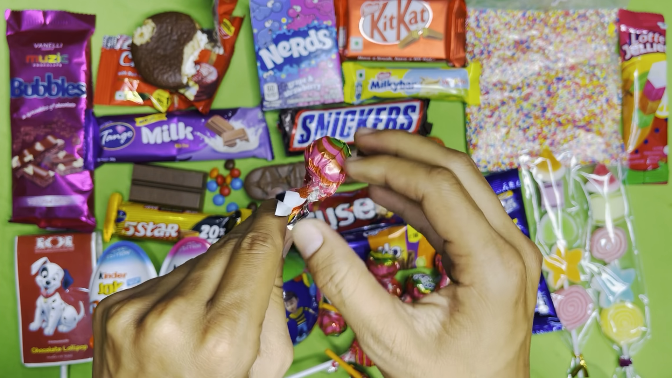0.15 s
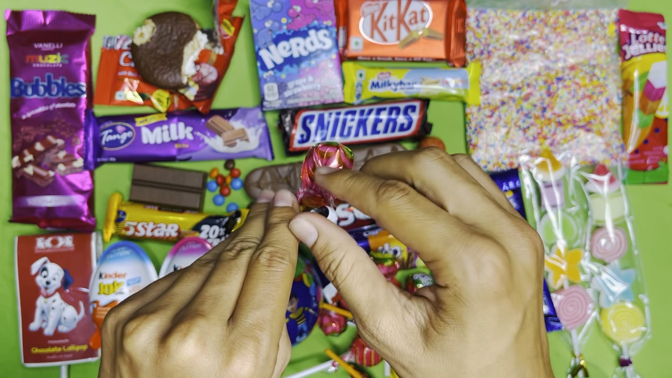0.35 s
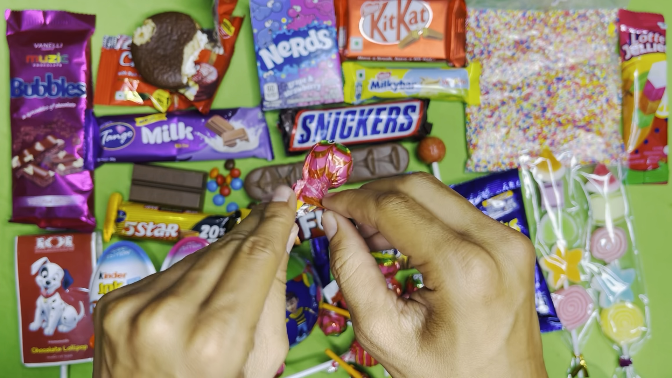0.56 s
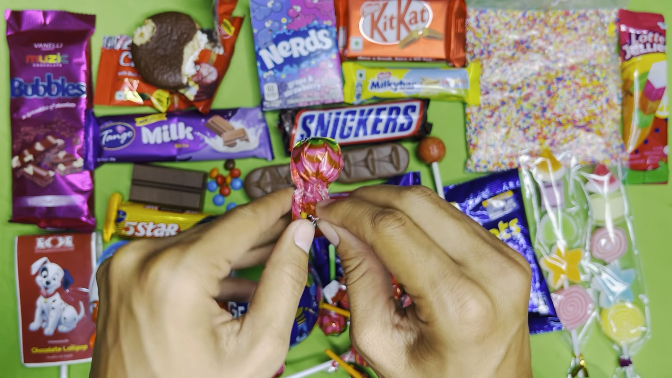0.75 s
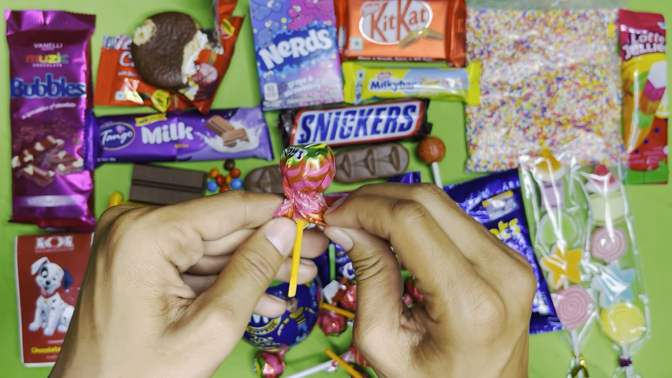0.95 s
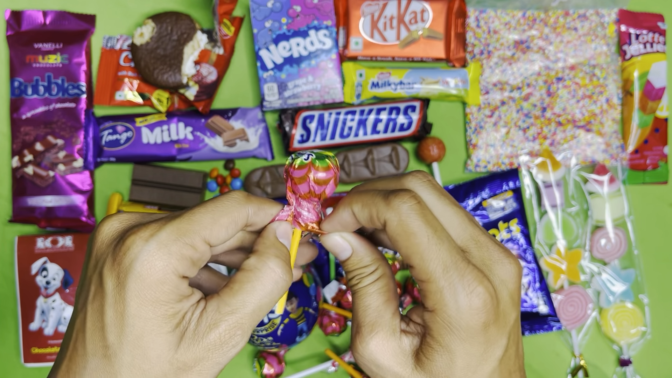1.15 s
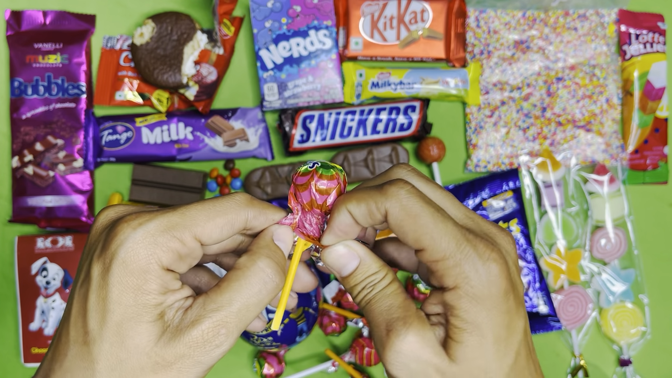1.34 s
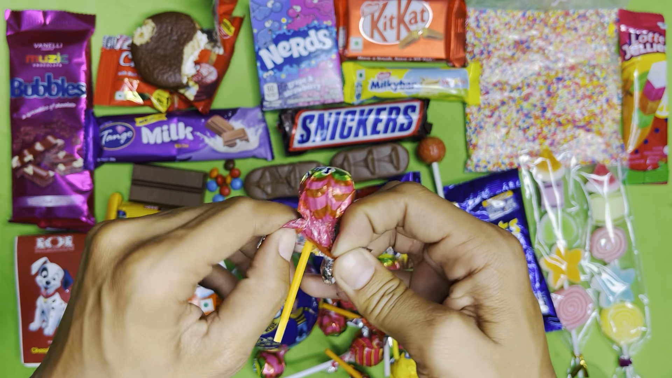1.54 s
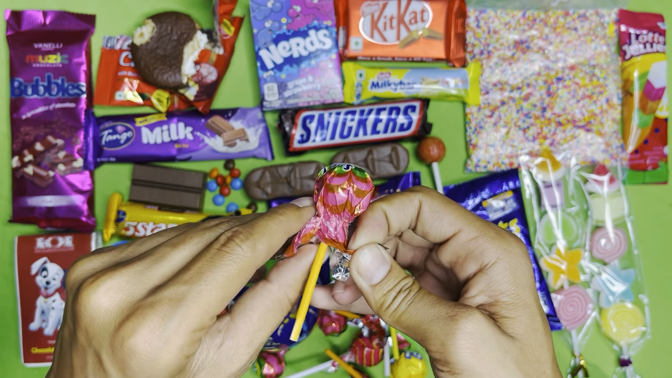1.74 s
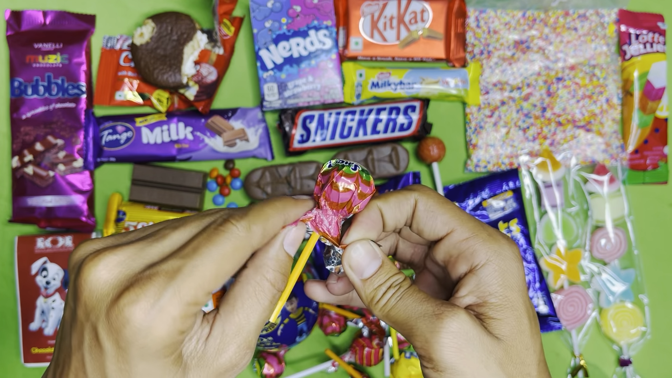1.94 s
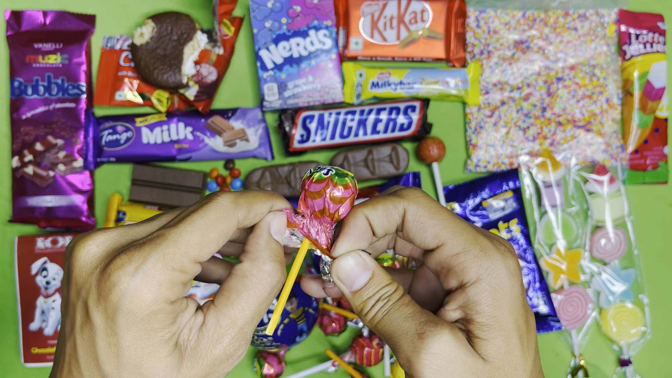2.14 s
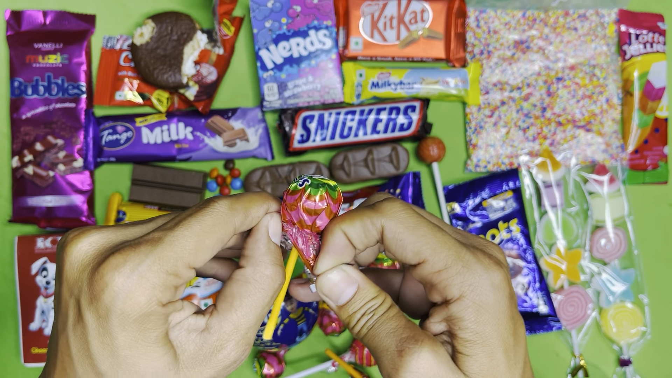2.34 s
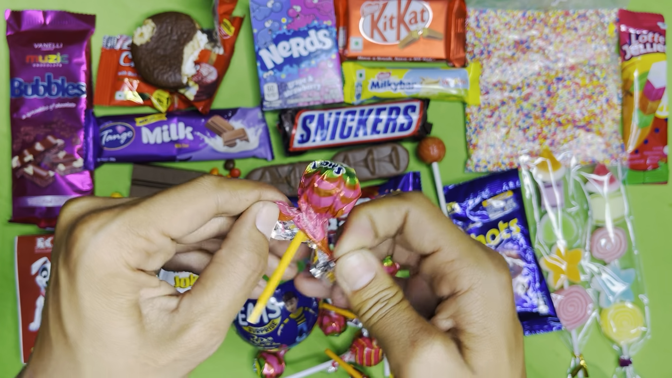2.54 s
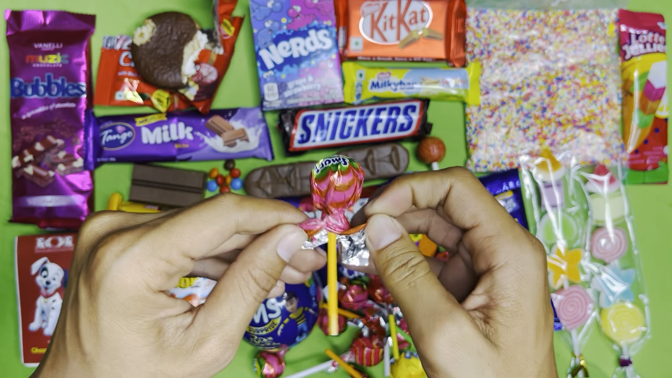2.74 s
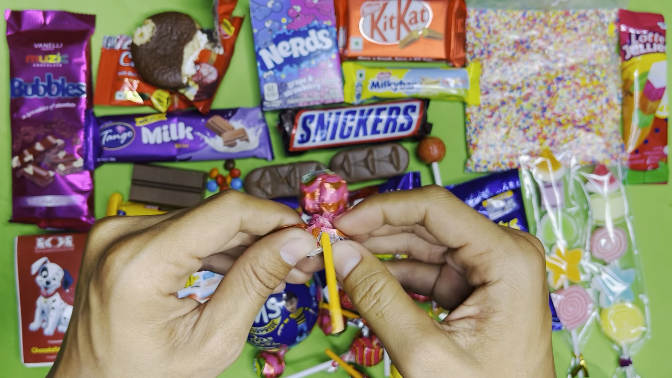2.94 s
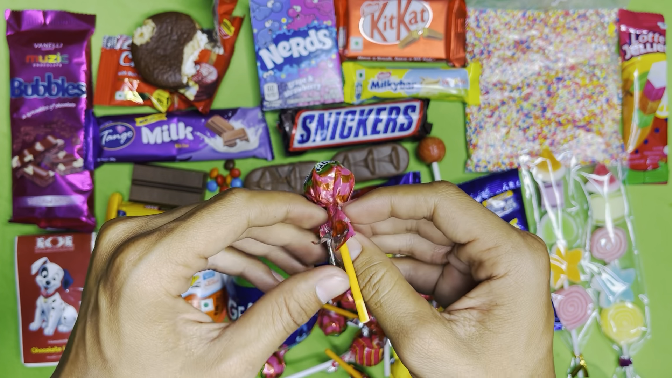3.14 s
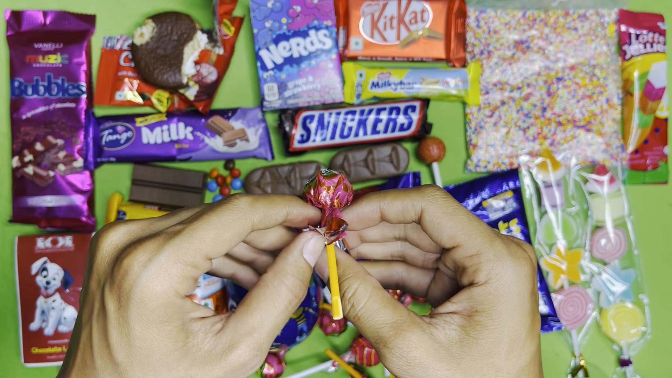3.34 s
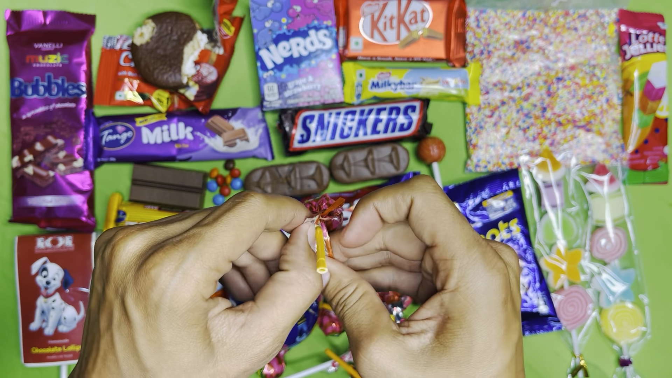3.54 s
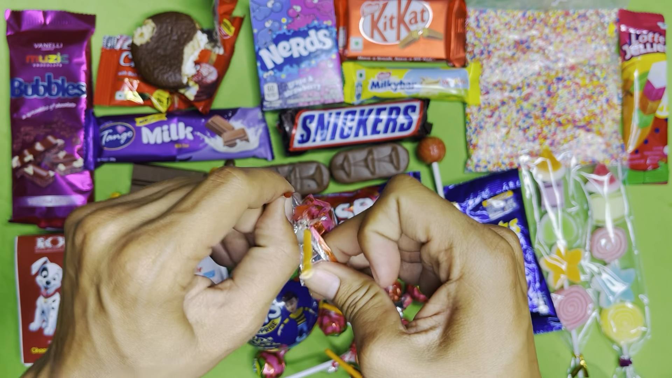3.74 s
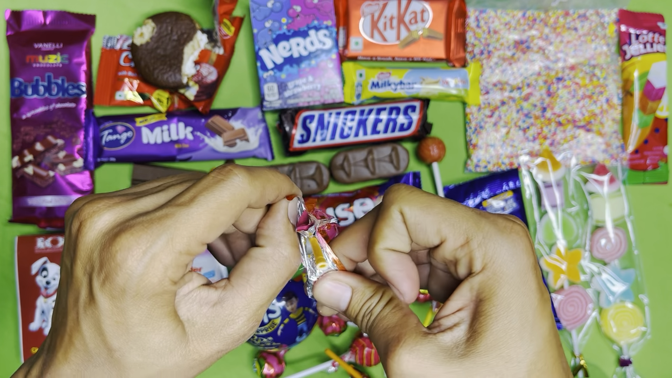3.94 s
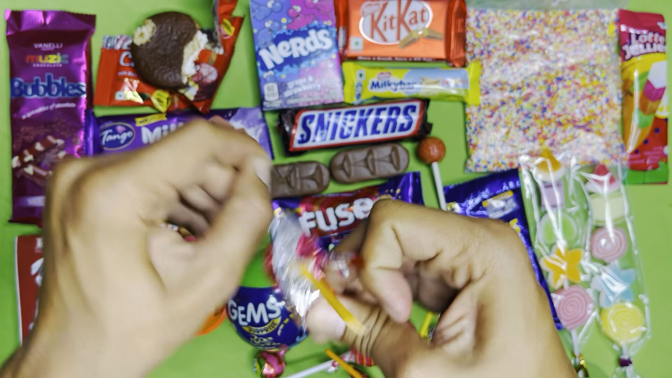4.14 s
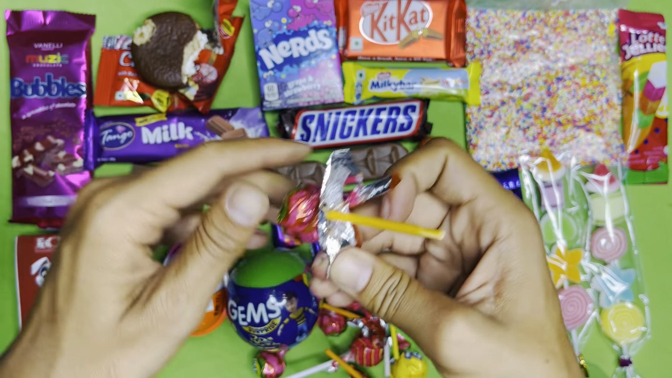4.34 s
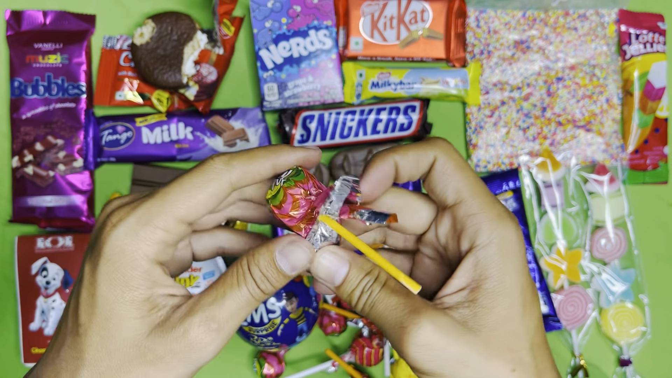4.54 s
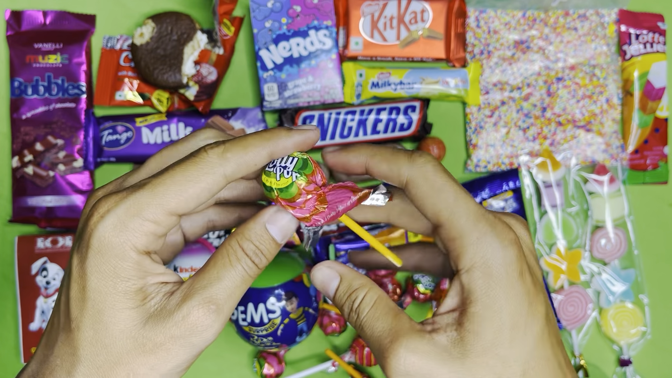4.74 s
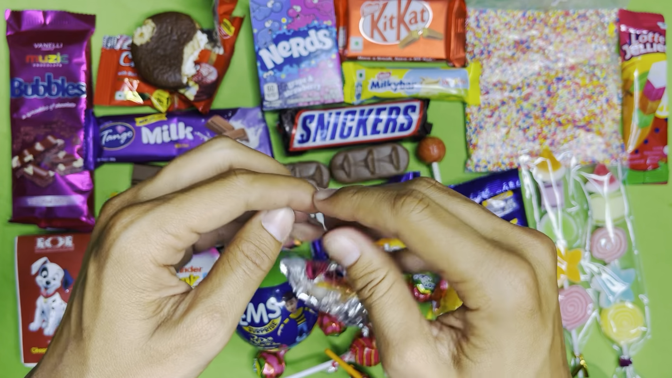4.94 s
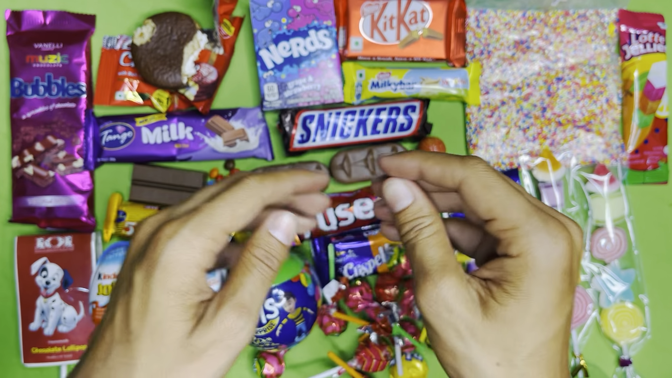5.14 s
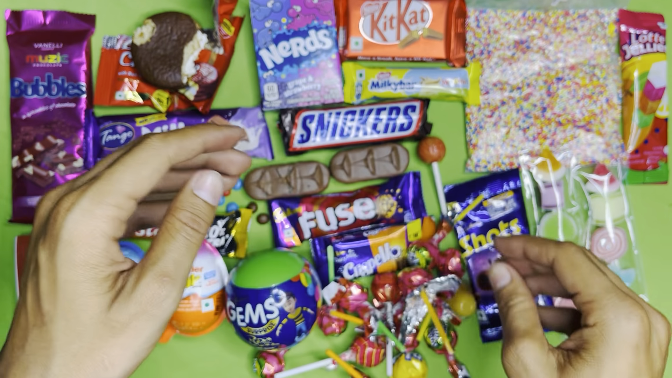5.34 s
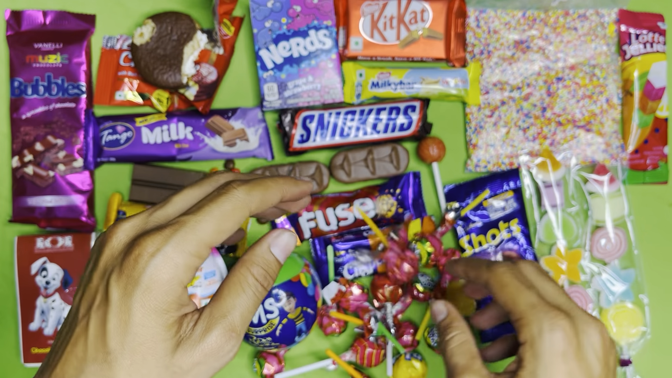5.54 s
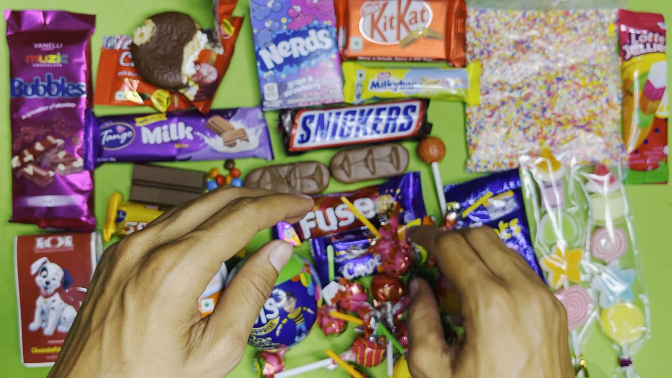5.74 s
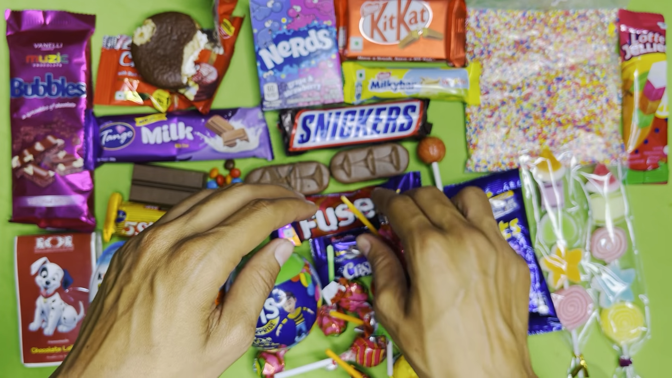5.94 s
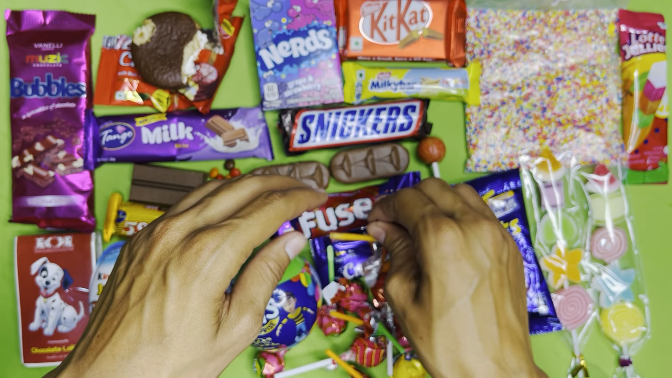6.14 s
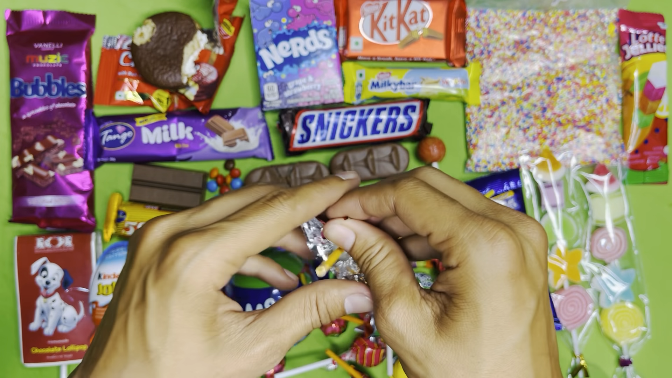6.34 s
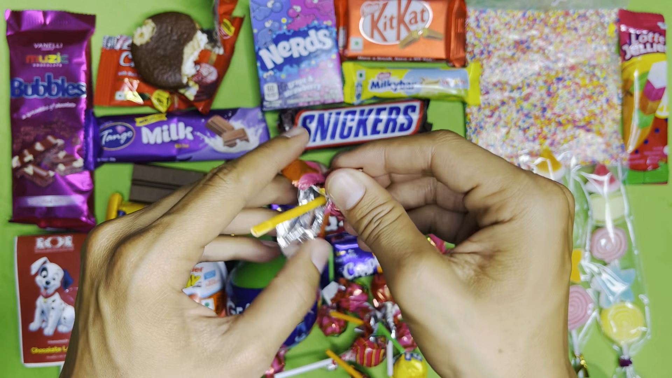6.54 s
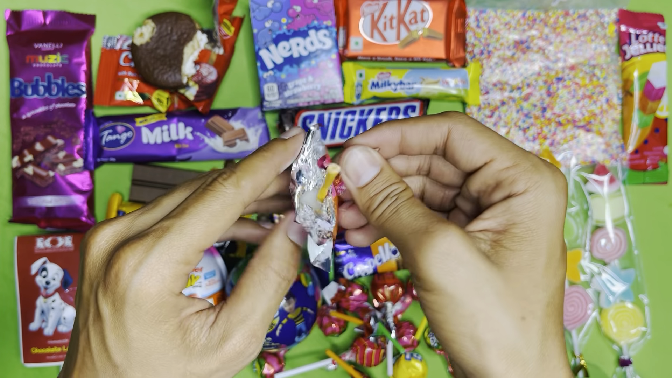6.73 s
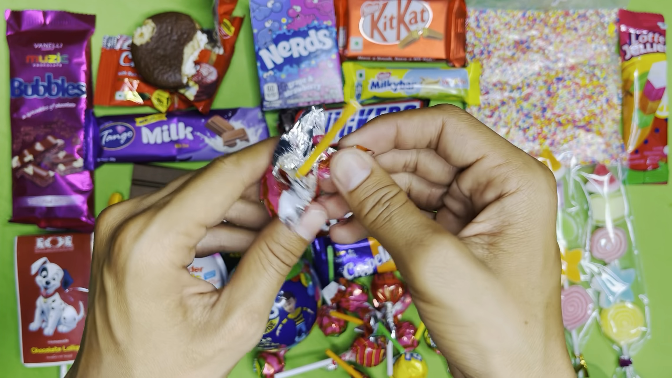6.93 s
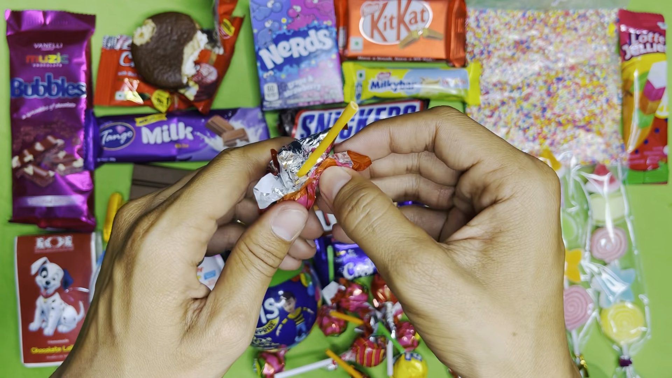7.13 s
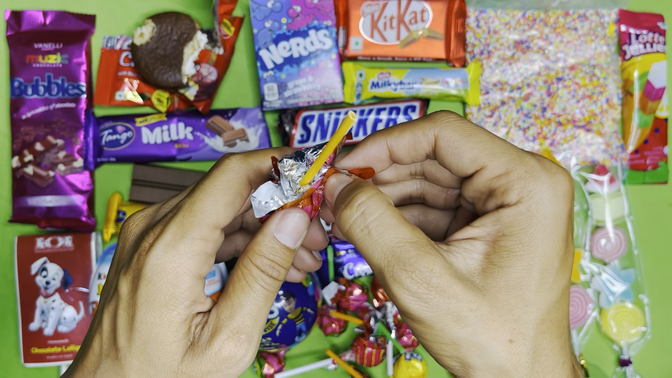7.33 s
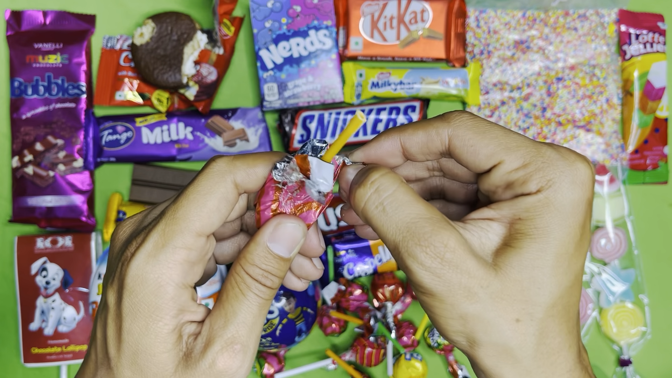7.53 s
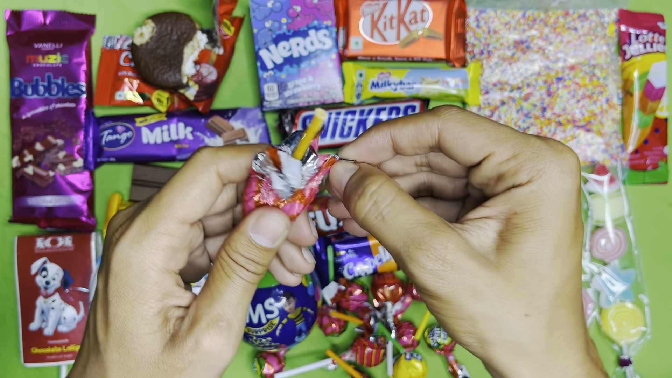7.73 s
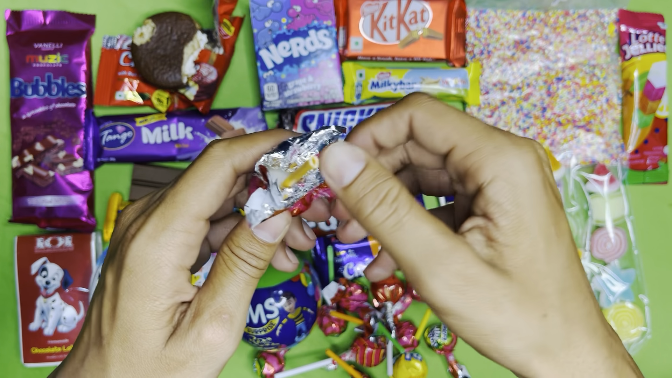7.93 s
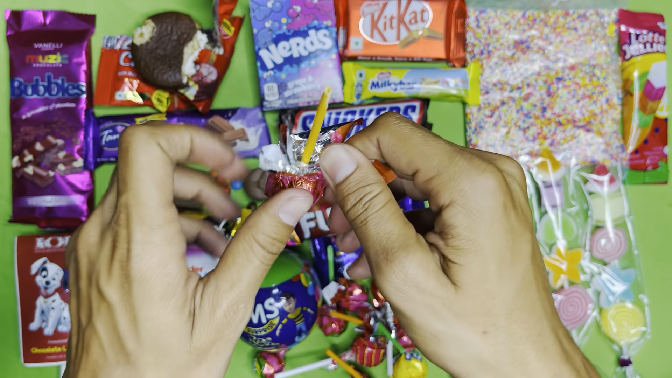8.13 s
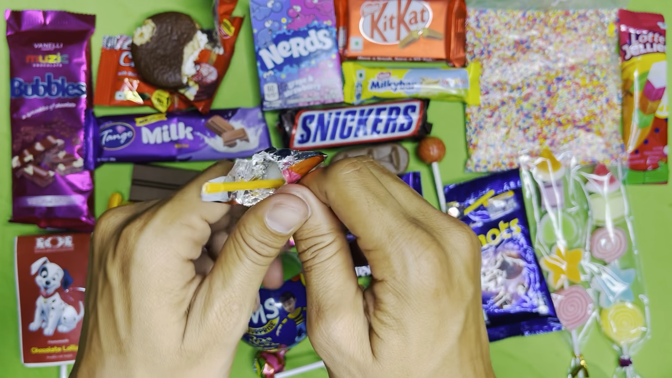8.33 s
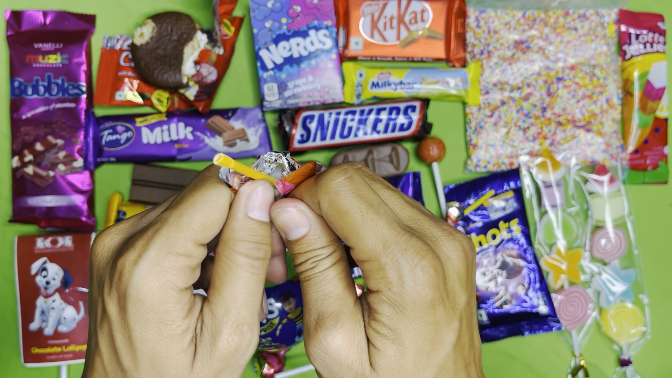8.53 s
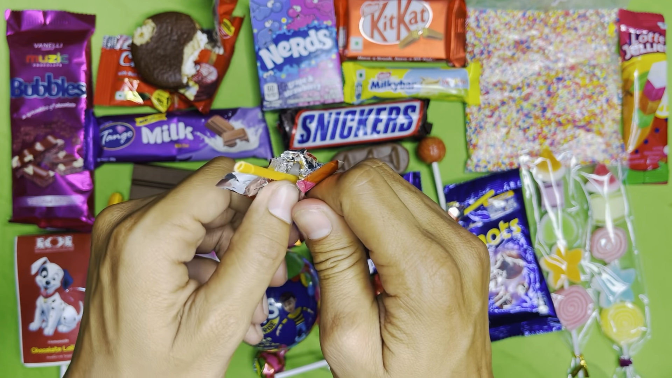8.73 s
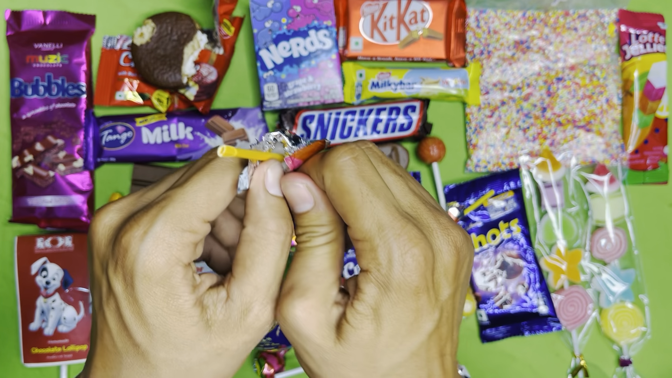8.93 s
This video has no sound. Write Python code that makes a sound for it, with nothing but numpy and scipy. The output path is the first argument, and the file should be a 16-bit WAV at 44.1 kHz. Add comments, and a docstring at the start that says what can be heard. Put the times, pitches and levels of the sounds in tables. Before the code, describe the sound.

Stiff foil-plastic candy wrapper crinkled and torn close by, bright snaps over fine crackle, one hard table knock midway, faint low rumble behind.

```python
"""Close to a two-port microphone in a live room, fingers work the stiff foil-plastic wrapper of a lollipop.
First light rustles and bright snaps over a fine crackle, with a low rumble behind that comes and goes.
Near 3.7 to 4.2 s the twist tears open: the loudest snaps, whole panels that pop, tugs that thud.
At 5 s something hard knocks once on the table and the room answers; a sparser stretch follows.
From 6 s peeling resumes and runs to the end. Filtered noise bursts make the snaps, pops, crackle and knock."""
import sys
import numpy as np
from scipy import signal
from scipy.fft import rfft, irfft, next_fast_len
from scipy.io import wavfile
from scipy.ndimage import uniform_filter1d

SR = 44100
rng = np.random.default_rng(int(sys.argv[2]) if len(sys.argv) > 2 else 0)


def persist_wave(psi):
    """Save psi, clipped to +-1, as 16-bit WAV."""
    counts = np.round(np.clip(psi, -1, 1) * 32767).astype(np.int16)
    wavfile.write(sys.argv[1], SR, np.atleast_2d(counts).T)


N = 396011  # samples
MS = SR / 1000  # samples in 1 ms: energy-1 sounds times sqrt(MS) get their level as rms over 1 ms


def amp(db):
    """Decibels to gain."""
    return 10 ** (np.asarray(db) / 20)


def unit(x):
    """Scales a sound to energy 1."""
    return x / np.sqrt(np.sum(x ** 2) + 1e-20)


def read(points, hz):
    """Reads a table of values against frequency on a log-frequency axis."""
    f, value = np.transpose(points)
    return np.interp(np.log(hz + 1), np.log(f + 1), value)


def bins(size):
    """Frequencies of a spectrum of that many samples."""
    return np.fft.rfftfreq(size, 1 / SR)


def add(mix, s, sound):
    """Mixes a sound in at a time in seconds."""
    part = mix[max(round(s * SR), 0):][:len(sound)]
    part += sound[:len(part)]


def hump(f, hz, octaves):
    """A broad resonance, in dB."""
    return -10 * np.log10(1 + (np.log2((f + 1) / hz) / octaves) ** 2)


def ring(push, colour_db):
    """Passes a short push through a causal, minimum-phase filter of that colour; energy 1."""
    log_gain = np.log(amp(np.maximum(colour_db, -80)))
    circle = np.concatenate([log_gain, log_gain[-2:0:-1]])
    response = np.exp(np.conj(signal.hilbert(circle)))[:len(log_gain)]
    return unit(irfft(rfft(push) * response))


def buckle(jolt_s, flutter_db, flutter_s, size=1024):
    """A jolt that swells and dies in a moment, plus a longer flutter."""
    t = np.arange(size) / SR
    jolt, flutter = rng.standard_normal((2, size))
    jolt = unit(jolt * t * np.exp(-t / jolt_s))
    flutter = unit(flutter * np.exp(-t / flutter_s))
    return jolt + amp(flutter_db) * flutter


def disperse(x, spread_s):
    """Bending waves cross a panel: the slow low ones arrive last."""
    phase = 4 * np.pi * spread_s * np.sqrt(100 * bins(len(x)))
    return irfft(rfft(x) * np.exp(-1j * phase))


def thud(hz, decay_s):
    """A low push whose pitch sinks to hz as it dies; energy 1."""
    t = np.arange(2048) / SR
    turns = np.cumsum(hz * (1 + 1.2 * np.exp(-t / .004))) / SR
    return unit(np.sin(2 * np.pi * turns) * np.exp(-t / decay_s))


# how alike diffuse sound is at the two ports: [frequency_hz, likeness (0 to 1)]
PORT_LIKENESS = [(100, 0.95), (300, 0.82), (400, 0.52), (600, 0.14), (1000, 0.03), (1500, 0.64),
                 (2000, 0.33), (3000, 0.13), (4500, 0.092), (6000, .93), (13000, .93)]


def diffuse(size):
    """Spectra of a noise that arrives from all sides, partly alike at the two ports."""
    left, other = rfft(rng.standard_normal((2, size)))
    same = np.clip(read(PORT_LIKENESS, bins(size)), 0, 1)
    right = same * left + np.sqrt(1 - same ** 2) * other
    return np.array([left, right])


def noise(colour):
    """Steady diffuse noise of that spectrum, rms 1."""
    spectra = diffuse(N) * amp(read(colour, bins(N)))
    return unit(irfft(spectra, N)) * np.sqrt(2 * N)


# far rumble, before its random waver: [time_s, level_db]
RUMBLE_LEVEL = [(0, -66.5), (1, -65), (2, -63), (3.3, -63), (3.6, -64), (4.35, -61), (4.55, -70.5),
                (4.95, -67.5), (5.3, -57), (5.649, -68.5), (5.9, -74.5), (7.15, -70.5), (7.3, -63.5),
                (7.6, -61), (8.1, -62.5), (8.98, -64)]
# air stirred as the hands shift: [time_s, level_db]
HANDLING_LEVEL = [(0, -64), (1, -71), (3.2, -70), (3.5, -60.5), (4.2, -88), (4.5, -94.5), (7.3, -91),
                  (7.55, -60), (7.85, -64), (8.101, -80), (8.98, -87.5)]
# their spectra and that of the hiss, shape only: [frequency_hz, relative_db_per_hz]
RUMBLE_SPECTRUM = [(20, -48.5), (40, -22.5), (60, -9.5), (110, -5), (170, -6), (210, -1), (260, -9.5),
                   (298, 3.5), (335, -12), (450, -11.5), (650, -16.5), (1000, -26), (2000, -41.5)]
HANDLING_SPECTRUM = [(20, -43.5), (40, -9.5), (55, 2.5), (80, -3.5), (130, -2), (300, -27)]
HISS_SPECTRUM = [(100, 0), (500, -3), (900, -7), (1500, -4), (4000, -10), (11000, -9), (14000, -30),
                 (16500, -48)]


def background(hiss_db=-78, waver_db=1.5, waver_step_s=.09):
    """Low rumble that swells, sinks and wavers, air stirred by the hands, and a faint hiss."""
    t = np.arange(N) / SR
    rumble_db = np.interp(t, *np.transpose(RUMBLE_LEVEL))
    handling_db = np.interp(t, *np.transpose(HANDLING_LEVEL))
    moments = np.arange(0, t[-1] + 1, waver_step_s)
    rumble_db += waver_db * np.interp(t, moments, rng.standard_normal(len(moments)))
    rumble = amp(rumble_db) * noise(RUMBLE_SPECTRUM)
    handling = amp(handling_db) * noise(HANDLING_SPECTRUM)
    return rumble + handling + amp(hiss_db) * noise(HISS_SPECTRUM)


# how long the room rings: [frequency_hz, time_to_fall_60_db_s]
ROOM_DECAY = [(100, 0.65), (260, 0.68), (700, 0.65), (1840, 0.53), (4850, 0.47), (12800, 0.39)]


def room(x, onset_s=.003):
    """A dense diffuse echo in which the bass hangs longest."""
    hz, t, z = signal.stft(irfft(diffuse(SR), SR), SR, nperseg=256)
    decay = amp(-60 * t / read(ROOM_DECAY, hz)[:, None])
    tail = signal.istft(z * decay, SR, nperseg=256)[1]
    tail *= 1 - np.exp(-(np.arange(tail.shape[1]) / SR / onset_s) ** 2)
    tail = np.array([unit(side) for side in tail])
    return signal.fftconvolve(x[None], tail, axes=1)[:, :N]


# hard knock on the table, level of its board sound over 1 ms: [start_s, level_db]
TABLE_KNOCKS = [(5.0181, -8)]
# spectrum of the board, shape only: [frequency_hz, relative_db_per_hz]
KNOCK_SPECTRUM = [(30, -30.5), (50, -13), (90, -6.5), (190, 4), (330, 2), (460, 5), (650, -9.5),
                  (1200, 1.5), (1900, -3), (3100, 1), (4800, -2.5), (7000, -11), (11000, -9.5),
                  (13500, -39), (16500, -47.5)]


def knocks(thud_db=-9, thud_hz=280, echo_db=-5, size=2048):
    """A hard, dead blow on a board, with a low thud; the room gathers it from all sides as one smooth wash."""
    near, spread = np.zeros((2, N))
    colour_db, blow = read(KNOCK_SPECTRUM, bins(size)), signal.unit_impulse(size)
    for s, db in TABLE_KNOCKS:
        rattle = amp(-6) * buckle(jolt_s=.0005, flutter_db=-6, flutter_s=.006, size=size)
        board = disperse(ring(blow + rattle, colour_db), spread_s=.006)
        low = amp(thud_db) * thud(thud_hz, decay_s=.011)
        add(near, s, amp(db) * (board + low))
        add(spread, s, amp(db + echo_db) * ring(blow, colour_db))
    return (near + room(spread)) * np.sqrt(MS)


# hard tugs that jerk the whole lollipop, dry level over 1 ms: [start_s, level_db, settled_pitch_hz]
TUGS = [(3.389, -50, 108.8), (3.682, -39, 140), (3.710, -47, 168.4), (4.024, -39.5, 154),
        (4.155, -26.5, 120), (7.524, -47, 138)]


def thuds():
    """The lollipop jerks in the fingers when the twist lets go."""
    out = np.zeros(N)
    for s, db, hz in TUGS:
        add(out, s, amp(db) * thud(hz, decay_s=0.0039))
    return out * np.sqrt(MS)


# spectra of a facet's tick and of the sheet around it, shape only: [frequency_hz, relative_db_per_hz]
CRACK_SPECTRUM = [(2500, -42.5), (4800, -5), (5800, -10), (7500, -7), (9300, -10), (11200, -4),
                  (12300, -13.5), (13800, -20), (15600, -19), (16600, -24.5)]
BODY_SPECTRUM = [(100, -25), (500, -8.5), (1100, -2), (1900, -5.5), (3200, -2.5), (4400, -5), (5600, -2.5),
                 (8000, -29.5)]


def crack(hz):
    """The bright tick of one small facet of film, gone in a few milliseconds."""
    push = buckle(jolt_s=.00008, flutter_db=-4.5, flutter_s=.0018)
    f = bins(len(push))
    return ring(push, read(CRACK_SPECTRUM, f) + hump(f, hz, octaves=0.15))


def body(hz, octaves):
    """The lower ring of the sheet around a facet."""
    push = buckle(jolt_s=.0002, flutter_db=-4, flutter_s=.002)
    f = bins(len(push))
    return ring(push, read(BODY_SPECTRUM, f) + hump(f, hz, octaves))


# a crack's pitch is chance; the harder a crease shakes the sheet, the larger and lower the patch that rings
CRACK_HZ, CRACK_SCATTER_OCTAVES = 8980, 0.14
BODY_HZ, BODY_AT_DB, BODY_OCTAVES = 2960, -23, .32  # lowest pitch, level that reaches it, width of the ring
BODY_RISE_OCTAVES_PER_DB, BODY_TOP_HZ = 0.57, 4860  # softer rings sit higher, up to this top
BODY_SCATTER_OCTAVES = 0.15  # chance on top of those pitches


def snap(crack_db, body_db, crack_chance, body_chance):
    """A crease gives way with a crack and shakes the sheet."""
    crack_hz = CRACK_HZ * 2 ** (CRACK_SCATTER_OCTAVES * crack_chance)
    softer_db = max(BODY_AT_DB - body_db, 0)
    body_hz = min(BODY_HZ * 2 ** (BODY_RISE_OCTAVES_PER_DB * softer_db), BODY_TOP_HZ)
    body_hz *= 2 ** (BODY_SCATTER_OCTAVES * body_chance)
    tick = amp(crack_db) * crack(crack_hz)
    sheet = amp(body_db) * body(body_hz, BODY_OCTAVES)
    return (tick + sheet) * np.sqrt(MS)


RELEASE_S = .012


def press(length, attack_s, swell_db):
    """Finger pressure: an attack, a hold that may swell, and a release."""
    t = np.arange(0, length + 8 * RELEASE_S, 1 / SR)
    attack = np.minimum(t / attack_s, 1)
    hold = amp(swell_db * (np.minimum(t / length, 1) - 1.0))
    release = np.exp(-np.maximum(t - length, 0) / RELEASE_S)
    return attack * hold * release


# Crackle gains below are relative drives, not final levels. # spells in which the wrapper is worked and keeps
# rustling, or settles on the table just after the knock: [start_s, length_s, fine_db, body_db]
RUSTLE_SPELLS = [(0, 0.23, -57, -69.5), (0.337, 0.63, -69, -74.5), (0.905, 0.37, -58.5, -67),
                 (1.21, 0.47, -50.5, -63), (1.675, 1.63, -59, -68.5), (3.403, 1.57, -54.5, -63),
                 (5.103, .3, -64, -62.5), (5.45, .55, -80.5, -79), (5.98, 1.15, -59.5, -61.5),
                 (7.29, .81, -56.5, -66), (8.283, 0.65, -54.5, -65.5)]
# single squeezes of the fingers, and the wrapper's ticks as it falls and settles on the table just after the
# knock at 5 s: [start_s, length_s, fine_db, body_db]
FINGER_SQUEEZES = [(0.053, 0.048, -42.5, -54.5), (0.407, 0.02, -59, -62), (0.606, 0.037, -51.5, -54.5),
                   (0.698, 0.044, -49, -54.5), (0.963, 0.031, -49.5, -66), (1.24, 0.02, -51, -71),
                   (1.338, 0.037, -55, -70), (1.612, 0.041, -41, -49), (1.991, 0.029, -57.5, -53.5),
                   (2.372, 0.03, -47, -63), (2.51, 0.044, -44.5, -57), (2.601, 0.022, -41, -67),
                   (2.836, 0.073, -57, -63), (2.906, 0.032, -46.5, -57.5), (3.084, 0.047, -44.5, -56.5),
                   (3.394, 0.059, -49, -53.5), (3.616, 0.022, -39, -71), (3.678, 0.041, -36, -47),
                   (3.726, 0.039, -25, -36), (4.019, 0.018, -31, -44), (4.138, 0.027, -29.5, -43),
                   (4.521, 0.017, -62, -51.5), (4.609, 0.024, -42, -45), (4.732, 0.1, -49.5, -57.5),
                   (4.817, .06, -51.5, -51), (5.048, 0.021, -35.5, -67), (5.151, 0.022, -49, -66),
                   (5.236, 0.027, -51, -53.5), (5.554, 0.052, -56.5, -58.5), (6.03, 0.032, -51, -56),
                   (6.244, 0.023, -67, -52.5), (6.351, .03, -47, -57), (6.466, 0.056, -45, -52),
                   (6.576, 0.032, -39, -45), (6.74, 0.024, -46.5, -53), (6.806, 0.026, -72, -58),
                   (6.984, 0.034, -48, -54.5), (7.285, 0.031, -40.5, -58.5), (7.348, 0.068, -39.5, -63),
                   (7.423, 0.072, -32, -50), (7.511, 0.021, -55, -50), (7.731, 0.059, -45.5, -59),
                   (7.953, 0.093, -49.5, -52), (8.275, 0.032, -54, -45), (8.365, 0.022, -41, -48),
                   (8.483, .045, -36.5, -53.5), (8.654, 0.037, -64, -55), (8.81, 0.054, -52, -82),
                   (8.919, .055, -42, -56)]
SPELL_ATTACK_S = 0.013  # the fingers take hold gently
SQUEEZE_ATTACK_S, SQUEEZE_SWELL_DB = 0.0091, 2.5  # pressure builds through a squeeze, then lets go


def crumpling():
    """Gain of the fine crackle and of its body: squeezes on top of the light rustle of each spell."""
    fine, low = np.zeros((2, N))
    spells = RUSTLE_SPELLS, SPELL_ATTACK_S, 0
    squeezes = FINGER_SQUEEZES, SQUEEZE_ATTACK_S, SQUEEZE_SWELL_DB
    for rows, attack_s, swell_db in (spells, squeezes):
        for s, length, fine_db, body_db in rows:
            pressure = press(length, attack_s, swell_db)
            add(fine, s, amp(fine_db) * pressure)
            add(low, s, amp(body_db) * pressure)
    return fine + amp(-100), low  # the fine crackle never quite stops


def crackle(per_s=380, fine_db=-0.5, sheet_db=-2, count=16):
    """Tiny creases give way at random; harder crumpling makes them denser and louder."""
    fine, low = crumpling()
    rate = per_s * (fine / amp(-50.5)) ** 0.49  # per_s holds at a fine gain of -50.5 dB
    happens = rng.random(N) < rate / SR
    sizes = amp(5 * np.minimum(rng.exponential(1, N), 3)) * happens
    # the fingers feed in energy steadily, so few creases means large ones
    sizes /= np.sqrt(abs(uniform_filter1d(sizes ** 2, size=1800)) + 0.0028)
    # between the ticks, film rubs on film
    sliding = .2 * rng.standard_normal(N)
    # each sample belongs to one of count facets, each with its own two pitches
    facet, out = rng.integers(0, count, N), np.zeros(N)
    facets_hz = zip(np.geomspace(6800, 11800, count), np.geomspace(1700, 5000, count))
    for k, (crack_hz, body_hz) in enumerate(facets_hz):
        clicks = (sizes + sliding) * (facet == k)
        out += signal.oaconvolve(clicks * fine * amp(fine_db), crack(crack_hz))[:N]
        out += signal.oaconvolve(clicks * low * amp(sheet_db), body(body_hz, octaves=0.2))[:N]
    return out


def small_snaps(above_db=16, scatter_db=1.5, sheet_db=-12, sheet_scatter_db=4, gap_s=.06):
    """Smaller creases go at random all through a spell and stand out of its rustle."""
    out = np.zeros(N)
    for start, length, db, _ in RUSTLE_SPELLS:
        for s in np.arange(start + gap_s, start + length - gap_s, gap_s):
            size, shake, *chance = rng.standard_normal(4)
            crack_db = db + above_db + scatter_db * size
            body_db = crack_db + sheet_db + sheet_scatter_db * shake
            add(out, s + gap_s * rng.random(), snap(crack_db, body_db, *chance))
    return out


# whole panels that flip, level over 1 ms before the trim in pops: [start_s, level_db, pitch_hz]
PANEL_POPS = [(0.644, -38, 840), (1.65, -41, 1120), (1.998, -42.5, 1090), (2.795, -40, 1200),
              (3.391, -46.5, 460), (3.679, -35, 550), (3.707, -27.5, 684), (3.749, -26, 910),
              (3.897, -43, 1308), (4.005, -52, 780), (4.023, -25, 1021), (4.154, -18, 917.4),
              (4.407, -38.5, 1010), (4.625, -35, 1120), (5.447, -44.5, 1220), (6.6, -41.5, 970),
              (6.757, -46, 1300), (6.996, -40.5, 1330), (7.439, -40, 942), (7.525, -42, 570),
              (7.845, -39, 1110), (7.922, -42.5, 1110), (7.967, -39, 1064), (8.012, -39, 986),
              (8.301, -38.5, 1256), (8.348, -41.5, 910), (8.387, -31.5, 1140), (8.527, -42, 1124),
              (8.661, -35, 1210), (8.929, -34.5, 1170)]


def pops(trim_db=-2.5, size=2048):
    """A whole panel of the wrapper flips with a short falling chirp."""
    out, f = np.zeros(N), bins(size)
    treble_cut_db = -10 * np.log10(1 + (f / 1750) ** 8)
    for s, db, hz in PANEL_POPS:
        colour_db = 1.22 * hump(f, hz, octaves=0.7) + treble_cut_db
        push = buckle(jolt_s=0.0001, flutter_db=-10.5, flutter_s=0.01, size=size)
        pop = disperse(ring(push, colour_db), spread_s=.0033)
        add(out, s, amp(db + trim_db) * pop)
    return out * np.sqrt(MS)


# large creases that buckle, levels over 1 ms before the trims in snaps: [start_s, crack_db, body_db]
LARGE_CREASES = [(0.096, -29, -35.5), (0.2306, -39.5, -70), (0.348, -43, -54), (0.4607, -39.5, -72),
                 (0.4823, -41, -56), (0.5314, -41, -74), (0.707, -37.5, -58), (0.742, -37.5, -55),
                 (0.802, -35, -41), (0.8975, -37, -37.5), (0.9382, -30, -43), (1.035, -30, -42),
                 (1.065, -20.5, -29.5), (1.2103, -26, -43.5), (1.264, -30, -36), (1.3013, -34.5, -40),
                 (1.346, -27.5, -43), (1.363, -25.5, -42), (1.422, -20, -47), (1.5246, -22, -51),
                 (1.569, -25.5, -59), (1.6173, -25, -41), (1.6337, -23, -30.5), (1.742, -30.5, -43.5),
                 (1.858, -29, -63), (1.9792, -24, -63), (2.018, -30.5, -42), (2.108, -27, -58),
                 (2.1753, -25, -38), (2.2469, -34.5, -47), (2.3734, -23.5, -37.5), (2.4225, -29.5, -44),
                 (2.5343, -27.5, -45), (2.579, -26, -48), (2.6144, -30, -66), (2.7684, -31, -60),
                 (2.796, -28, -37), (2.8585, -28, -63), (2.9136, -34, -48), (2.9723, -26.5, -42),
                 (3.0352, -26.5, -38), (3.121, -30, -38), (3.2464, -32, -48), (3.4588, -26, -40),
                 (3.6164, -28, -54.5), (3.63, -24.5, -33.5), (3.681, -11, -29), (3.6881, -21, -28),
                 (3.7089, -11.5, -23.5), (3.7362, -34, -23), (3.7488, -14, -13), (3.764, -24.5, -21.5),
                 (3.8987, -28, -26), (3.926, -21.5, -23.5), (4.0047, -14.5, -22.5), (4.0253, -9.5, -15.5),
                 (4.0434, -13, -37), (4.1219, -36, -22), (4.1534, -10.5, -18.5), (4.183, -10, -41),
                 (4.3831, -28.5, -41), (4.4089, -21, -36), (4.535, -27, -41), (4.5804, -30.5, -60),
                 (4.6244, -38, -38), (4.752, -28, -40.5), (4.815, -24.5, -31.5), (4.8219, -25, -36),
                 (4.8772, -22, -24), (4.9159, -30.5, -34), (5.55, -37, -45.5), (6.03, -31, -52),
                 (6.1067, -27.5, -44.5), (6.1594, -27, -60), (6.348, -32.5, -47), (6.5088, -23.5, -52),
                 (6.5958, -21.5, -30.5), (6.6291, -24, -31), (6.6926, -26, -42), (6.8277, -31.5, -30.5),
                 (6.923, -35, -46), (7.0627, -32.5, -45.5), (7.115, -26.5, -39.5), (7.294, -26, -27.5),
                 (7.345, -25.5, -49), (7.397, -25, -39), (7.44, -16.5, -30), (7.4589, -36, -33.5),
                 (7.472, -18.5, -32.5), (7.4973, -10.5, -29), (7.5668, -31, -38.5), (7.823, -15.5, -30),
                 (7.8352, -46, -31.5), (7.922, -29.5, -34.5), (7.9304, -25.5, -30), (7.984, -27, -53),
                 (8.0308, -27, -36), (8.0596, -27.5, -31.5), (8.113, -30.5, -58), (8.291, -30, -54.5),
                 (8.3515, -22.5, -29.5), (8.3881, -13.5, -22), (8.4116, -20.5, -44), (8.5048, -19.5, -38),
                 (8.5253, -24.5, -32), (8.647, -28.5, -68), (8.6958, -18, -37), (8.803, -26, -59),
                 (8.9335, -25, -49.5), (8.9552, -24.5, -56)]


def snaps(crack_trim_db=0, sheet_trim_db=-0.5, neighbour_db=-12, neighbour_s=.003):
    """The large creases buckle one by one; a smaller neighbour goes with each, mostly a moment later."""
    out = np.zeros(N)
    chances = rng.standard_normal((len(LARGE_CREASES), 5))
    for (s, crack_db, body_db), chance in zip(LARGE_CREASES, chances):
        crack_db, body_db = crack_db + crack_trim_db, body_db + sheet_trim_db
        add(out, s, snap(crack_db, body_db, *chance[:2]))
        neighbour = snap(crack_db + neighbour_db, body_db + neighbour_db, *chance[2:4])
        add(out, s + neighbour_s * (.5 + chance[4]), neighbour)
    return out


def scene():
    """The wrapper is close and fairly dry; the knock fills the room."""
    behind = knocks() + background()
    wrapper = snaps() + pops() + thuds() + crackle() + small_snaps()
    return wrapper + amp(-11.0) * room(wrapper) + behind


# phase between the two microphone ports: [frequency_hz, left_lead_radians]
PORT_PHASE = [(0, 0), (1400, -.1), (2800, .5), (4100, .8), (4900, 3.3), (5700, 6.1), (7000, 7.8),
              (9100, 9.45), (12000, 12.3), (13700, 12.8), (15500, 15.5)]


def record(dry, right_db=1.5, ceiling=.92, edge_hz=16700):
    """The right port lags the left and favours the upper mids; the sharpest peaks saturate; then the band limit."""
    size = next_fast_len(N + 2048)
    f = bins(size)
    lag = np.interp(f, *np.transpose(PORT_PHASE))
    lift_db = right_db * amp(hump(f, 3400, octaves=0.51))
    ports = np.array([np.ones(len(f)), np.exp(-1j * lag) * amp(lift_db)])
    heard = irfft(rfft(dry, size) * ports, size)[:, :N]
    heard = heard / (1 + (heard / ceiling) ** 4) ** (1 / 4)
    band = signal.firwin(255, edge_hz, window=("kaiser", 8), fs=SR)
    return signal.oaconvolve(heard, band[None], "same")


dry = scene()
out = record(dry)
persist_wave(out)
```